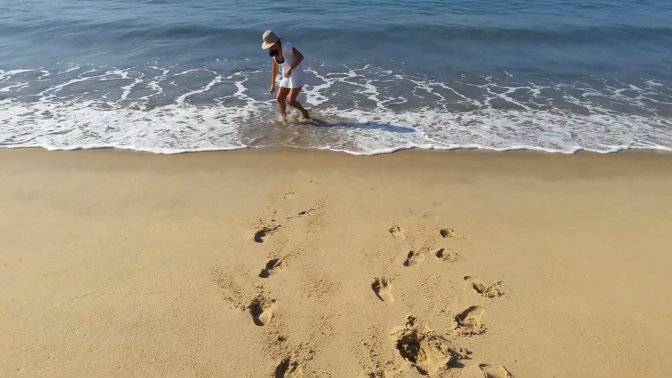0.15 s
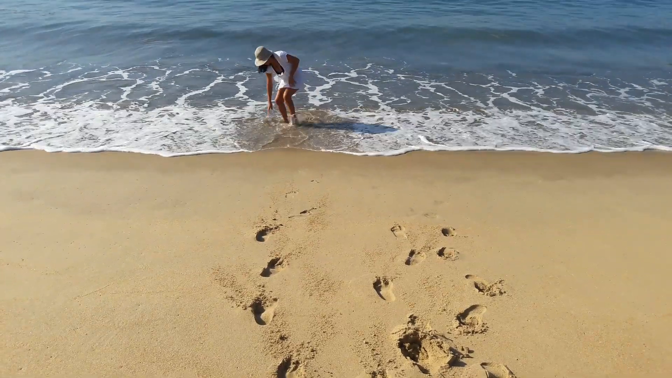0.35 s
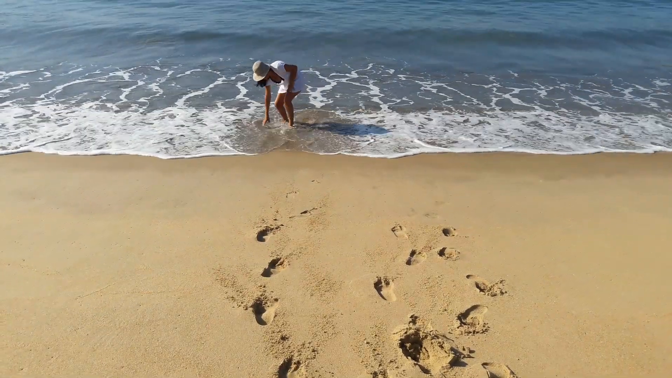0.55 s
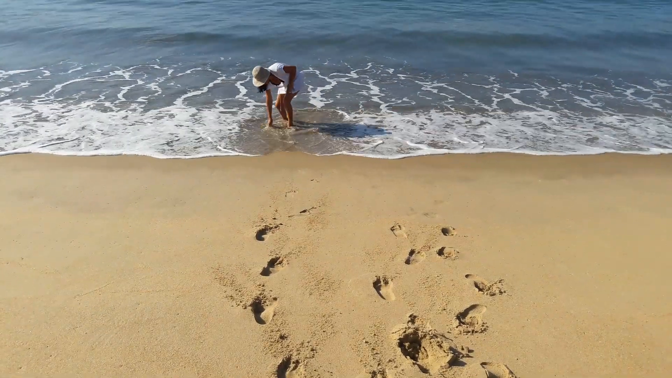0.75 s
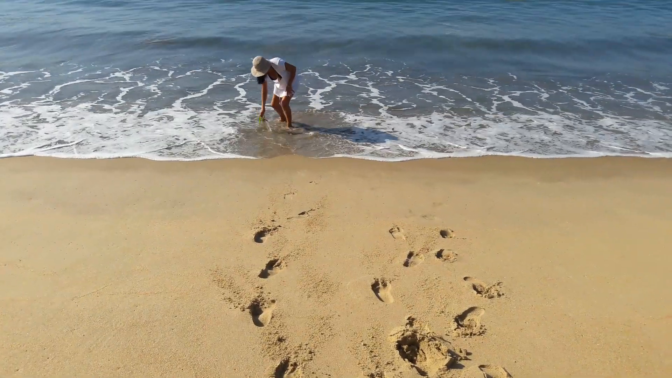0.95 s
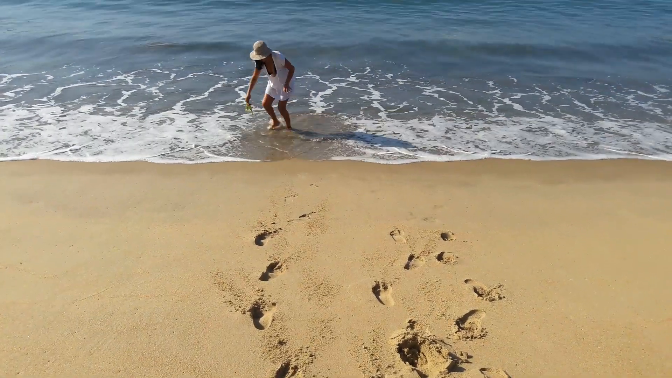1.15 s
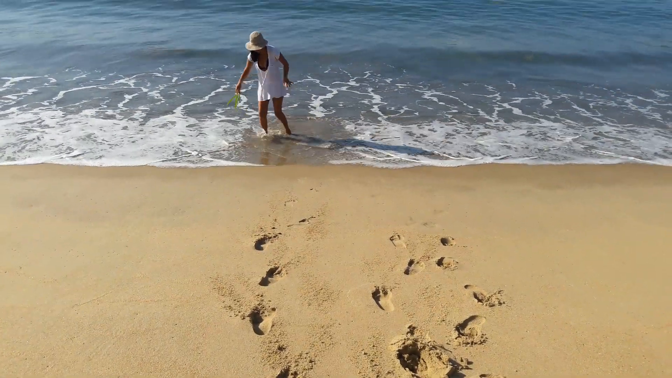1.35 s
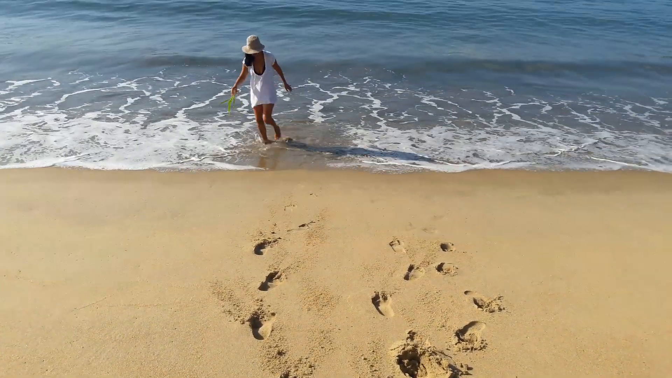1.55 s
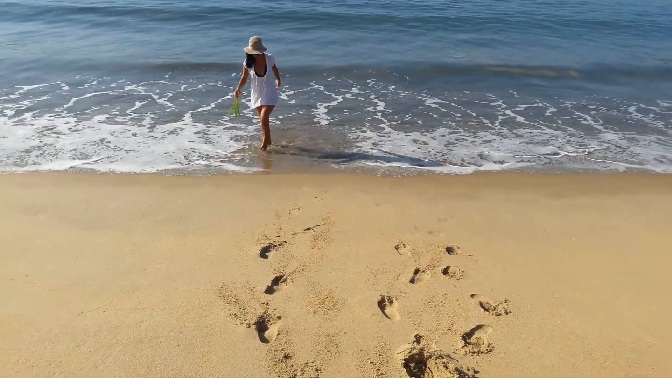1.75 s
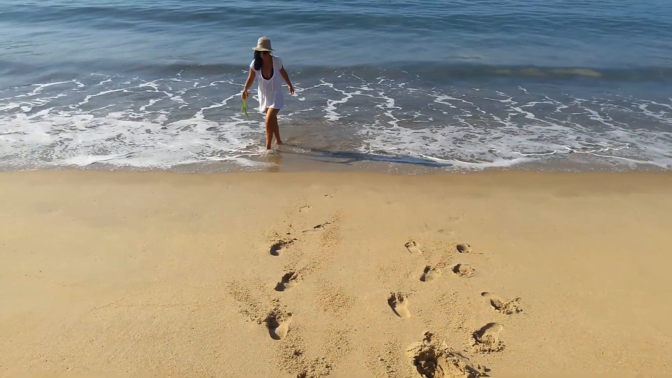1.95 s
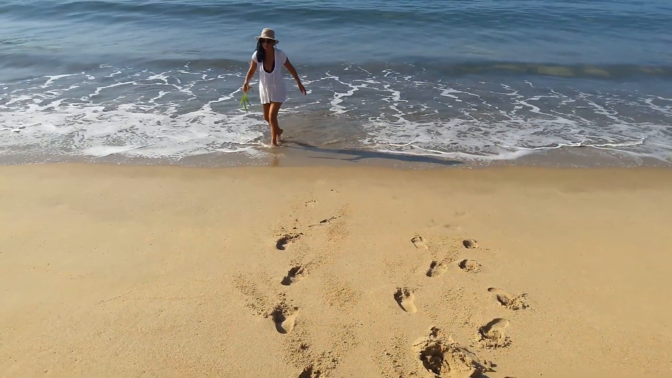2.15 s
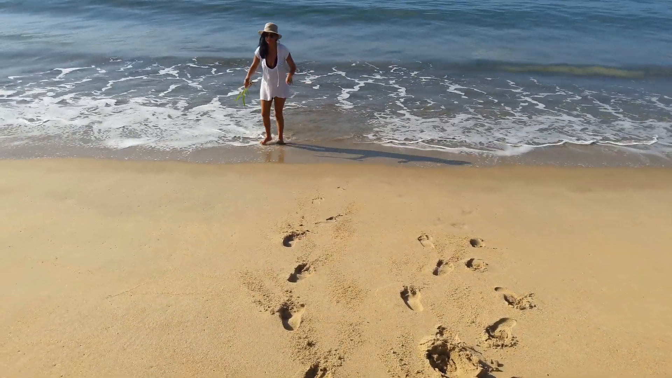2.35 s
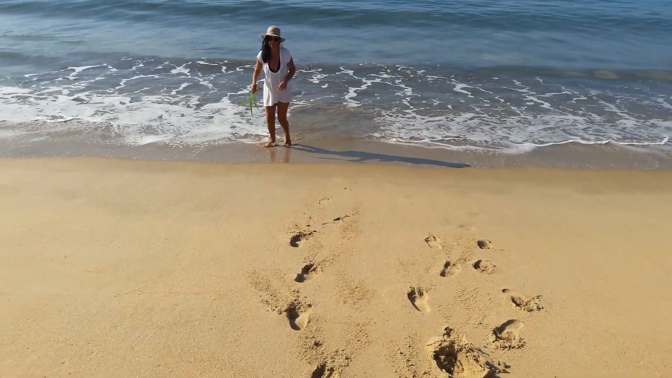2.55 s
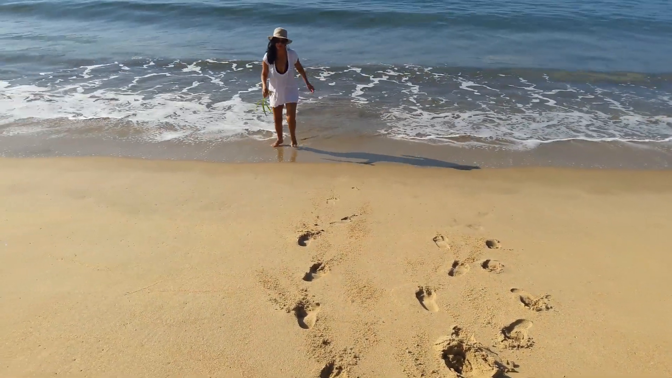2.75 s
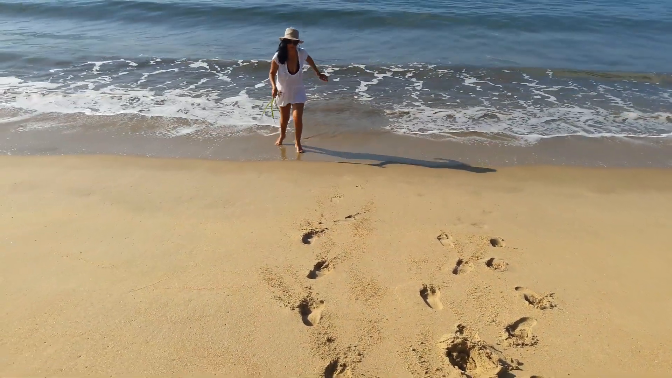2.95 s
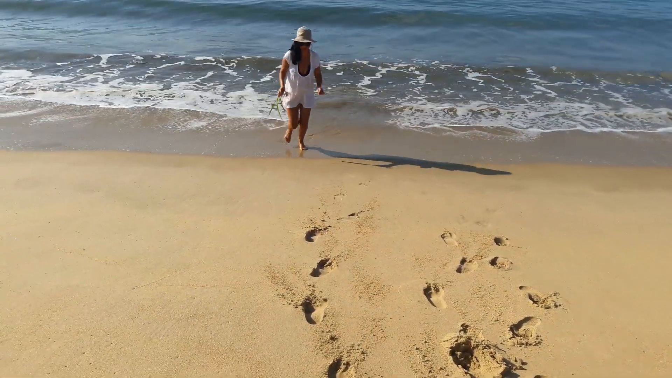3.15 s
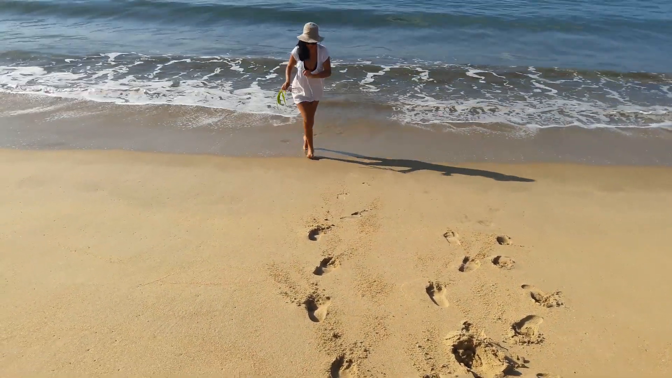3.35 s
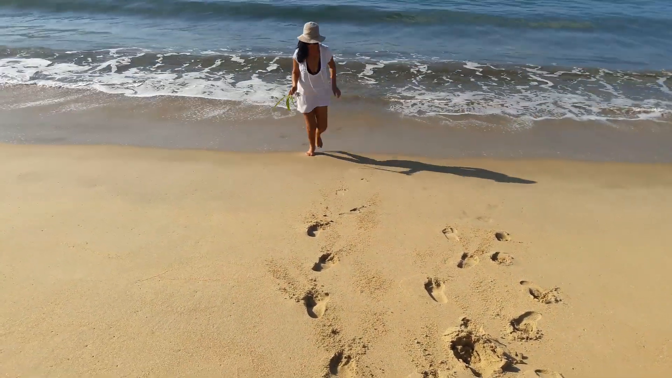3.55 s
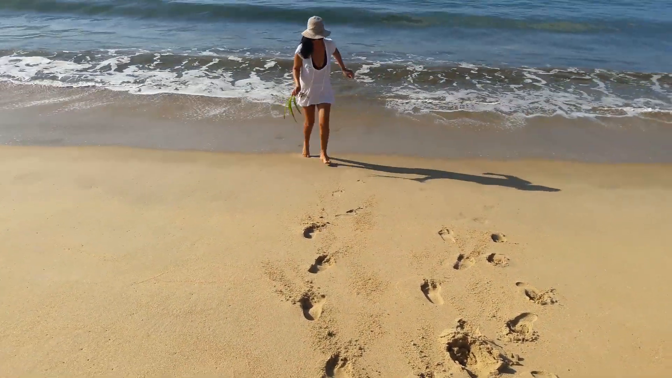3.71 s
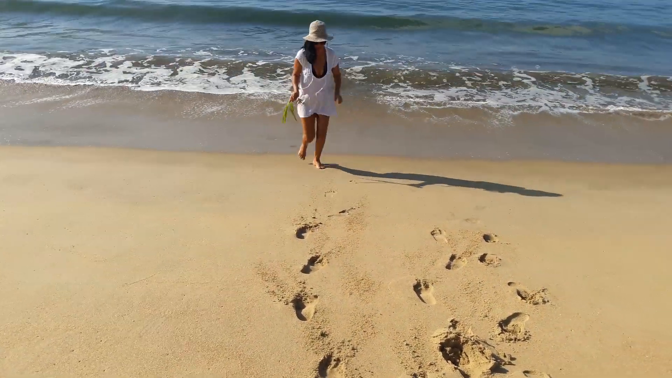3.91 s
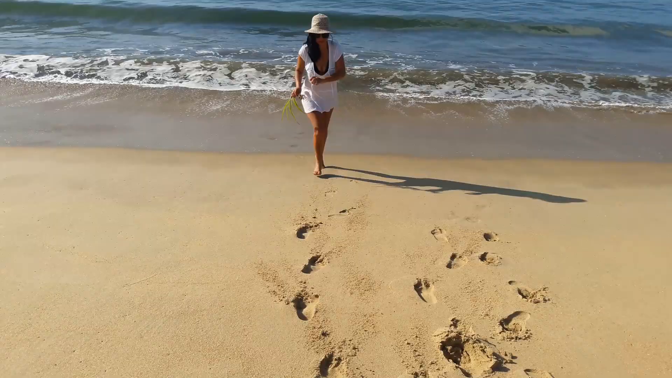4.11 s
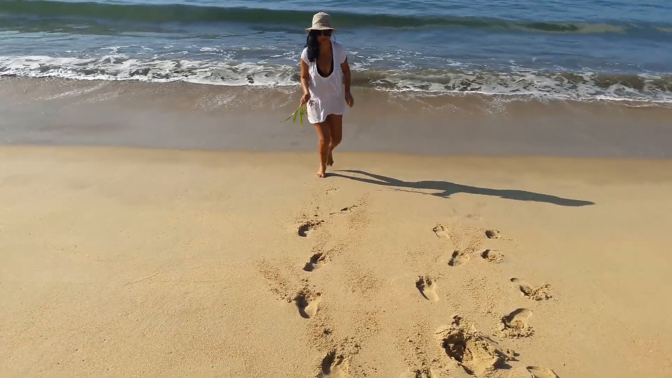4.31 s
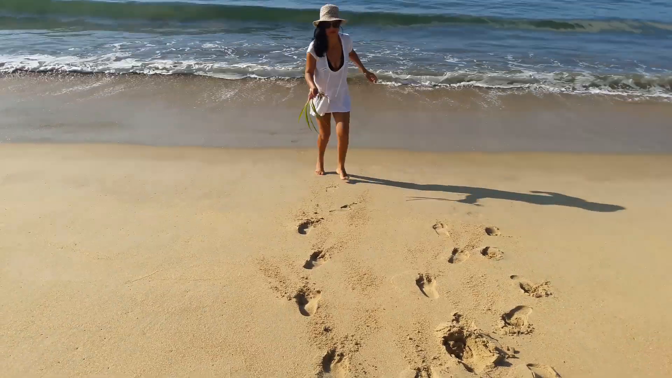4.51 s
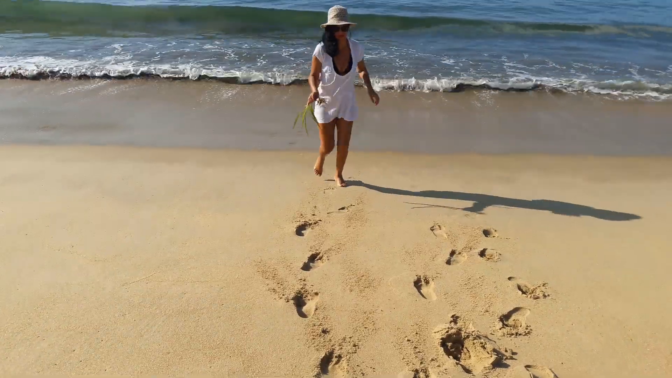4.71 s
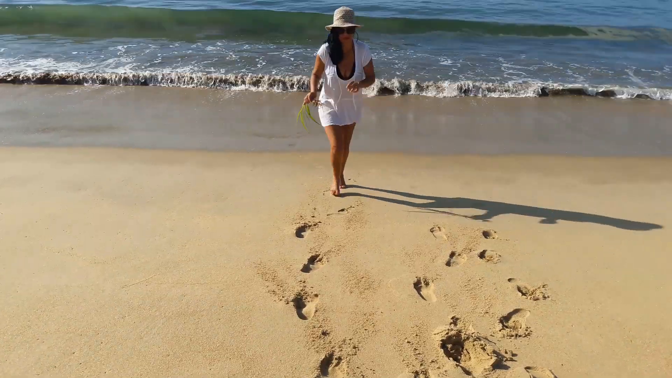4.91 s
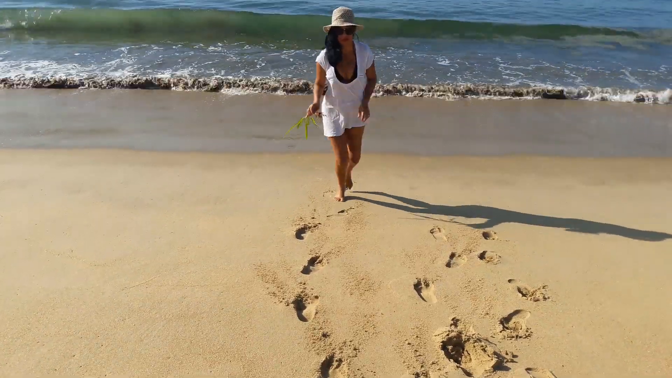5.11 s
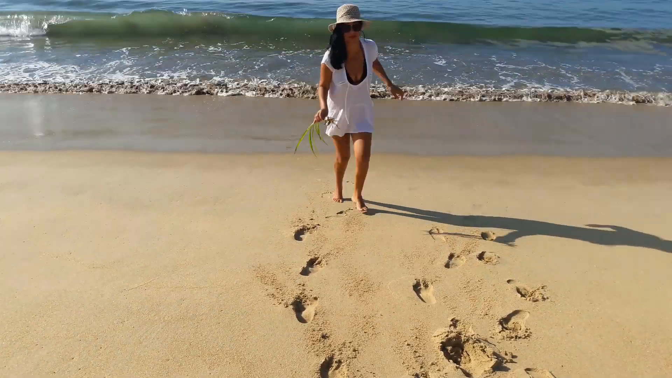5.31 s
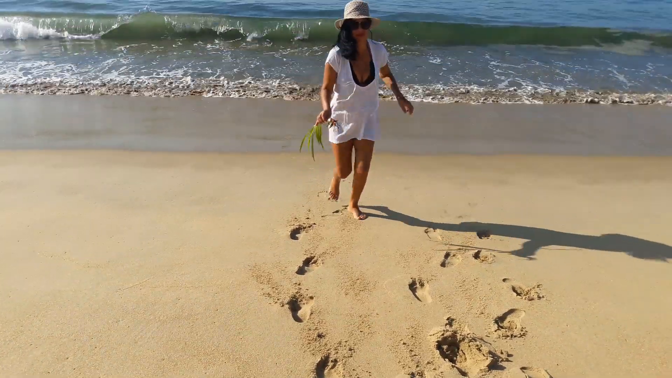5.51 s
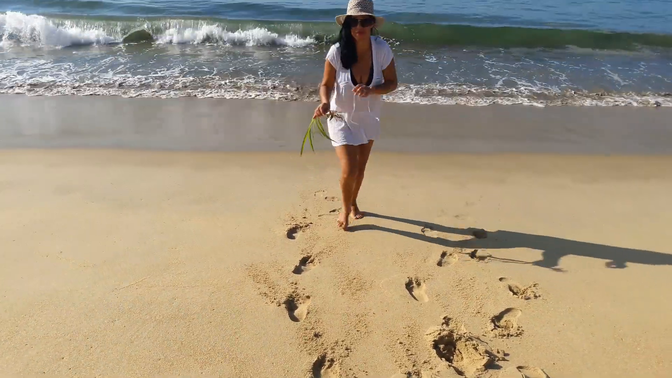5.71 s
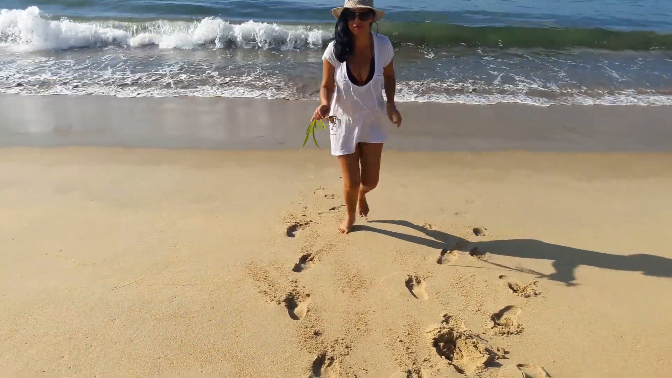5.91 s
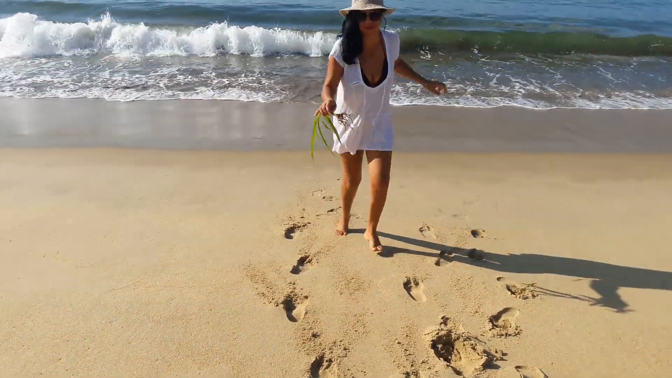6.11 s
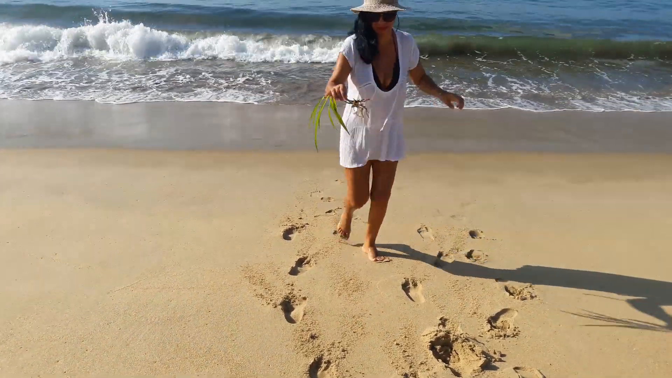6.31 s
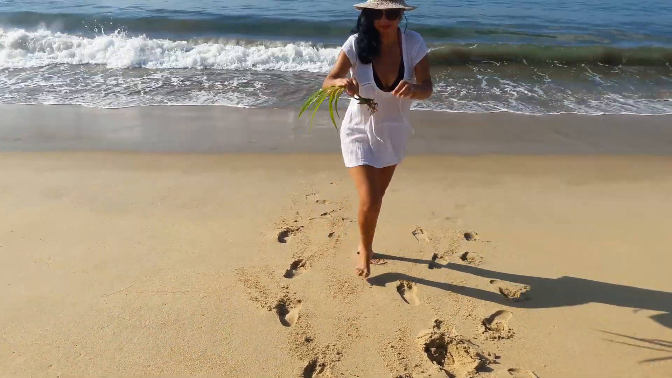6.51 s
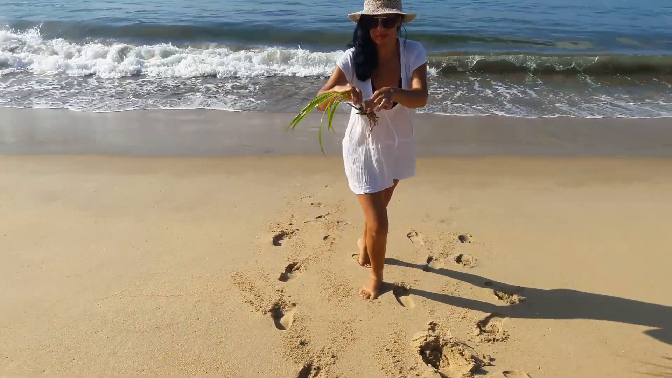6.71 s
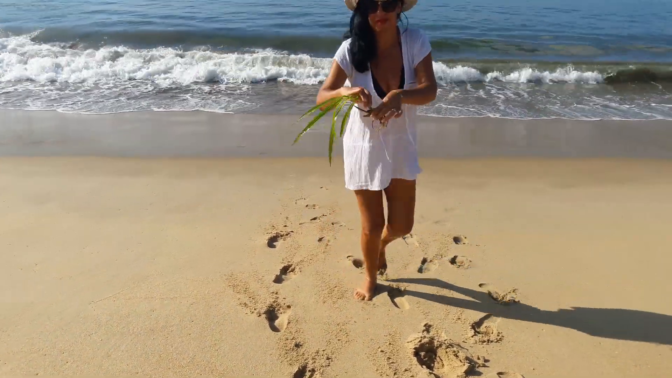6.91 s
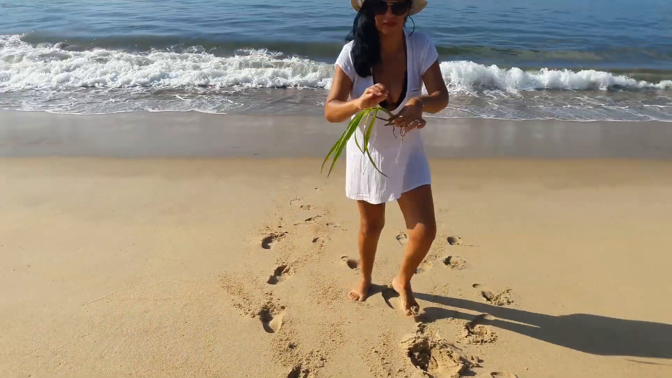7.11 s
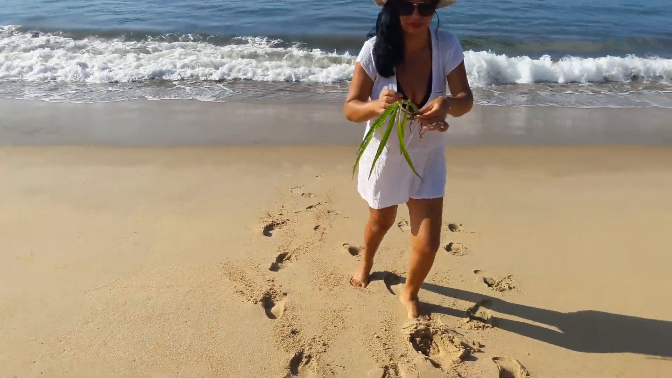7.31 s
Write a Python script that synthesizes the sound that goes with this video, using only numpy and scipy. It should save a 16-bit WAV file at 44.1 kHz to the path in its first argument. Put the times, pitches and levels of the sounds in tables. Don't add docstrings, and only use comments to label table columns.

```python
import sys
import numpy as np
from scipy import signal
from scipy.io import wavfile

SR = 44100
rng = np.random.default_rng(int(sys.argv[2]) if len(sys.argv) > 2 else 0)


def elevation(decibels):
    levels = np.asarray(decibels, float)
    return 10 ** (levels / 20)


def log_audio(samples):
    frames = np.atleast_2d(samples).T
    limited = np.clip(frames, -1, 1)
    pcm = np.round(limited * 32767).astype(np.int16)
    wavfile.write(sys.argv[1], SR, pcm)


N = 324569
STEP = 40


def surf(slosh_db, patch_db, flicker_db, bubble_db, splat_db):
    edges = 70 * 2 ** np.arange(0, 8.1, 1 / 3)
    hz = np.sqrt(edges[1:] * edges[:-1])
    steps = np.arange(N // STEP + 2) * STEP
    band_db = water_levels(hz, steps / SR)
    hiss = rng.standard_normal((2, N))
    pops = [bursts(per_s=900, spread_db=9), bursts(per_s=900, spread_db=7.5)]
    splats = bursts(per_s=300, spread_db=7)
    slosh = drift(25) + 0.53 * drift(40)
    patches = [drift(4.6) for k in range(len(hz) // 3 + 2)]
    out = np.zeros(N)
    for k, (low, high) in enumerate(zip(edges, edges[1:])):
        fizz = np.roll(hiss[k % 2] + elevation(bubble_db) * pops[k % 2], 977 * k)
        band = rms_one(band_pass(fizz + elevation(splat_db) * splats, low, high))
        bright = np.clip(np.log2(hz[k] / 120) / 16, 0, 1)
        part = k % 3 / 3
        patch = (1 - part) * patches[k // 3] + part * patches[k // 3 + 1]
        level_db = band_db[k] + slosh_db * bright * slosh + patch_db * patch + flicker_db * drift(15.6)
        level_db = level_db + gushes(hz[k], steps / SR)
        out += band * np.interp(np.arange(N), steps, elevation(level_db))
    return out


def water_levels(hz, t):
    # (frequency [Hz], density [dB per Hz])
    foam = [(53, -41), (90, -6), (218, 0), (1510, -5.5), (1880, -5), (3080, -15.5), (4070, -19),
            (5280, -28), (6690, -18.5), (15500, -31.5)]
    # (frequency [Hz], density [dB per Hz])
    breaker = [(53, -45), (90, -5.5), (264, 3), (526, -5), (1960, -9), (5050, -26), (6830, -23),
               (7770, -24), (13000, -34.5), (15500, -35)]
    # (time [s], force [dB], depth of its plunge [dB], distance [m])
    wave = [(3.0, -79, -5, 90), (3.5, -48, -3, 170), (3.8, -45, 0, 61), (4.18, -42.5, -1, 22),
            (4.3, -36, -2.5, 36), (4.7, -32.5, -4, 39), (4.86, -26, -6.5, 42), (5.1, -25, -9, 40),
            (5.25, -21.5, -10, 15), (5.45, -25, -1.5, 17), (5.7, -26, -1, 1.3), (5.9, -24.5, -1.5, 3.9),
            (6.3, -24.5, 0.5, 2), (6.55, -25, 0, 22), (6.9, -26, -1.5, 15), (7.1, -25, -3, 22),
            (7.36, -26, -0.5, 19)]

    def scaled(spectrum):
        db = at_hz(spectrum, hz) + 10 * np.log10(hz)
        middle = (hz > 500) & (hz < 2600)
        return (db - 10 * np.log10(elevation(2 * db)[middle].sum()))[:, None]

    drain_s, drain_db, drain_db_per_octave = 1.18, 3.5, 0.98
    drained = np.outer(drain_db + drain_db_per_octave * np.log2(hz / 250), 1 - np.exp(-t / drain_s))
    foam_db = scaled(foam) - 42.5 - drained

    s, *columns = np.transpose(wave)
    force_db, plunge_db, metres = [np.interp(t, s, c) for c in columns]
    air_db = np.outer(0.27 * (hz / 10000) ** 1.28, metres)
    plunge_hz = 557
    roar_db = np.outer(1 / (1 + (hz / plunge_hz) ** 3), plunge_db)
    wave_db = scaled(breaker) + force_db + roar_db - air_db

    mist_s, mist_rise_s, mist_db, mist_hz = 4.74, 0.16, -28, 8500
    mist_band = 1 / (1 + (mist_hz / hz) ** 4) / (1 + (hz / mist_hz / 1.6) ** 6)
    mist_power = np.clip((t - mist_s) / mist_rise_s, 0, 1) * elevation(2 * (force_db + mist_db))
    return 10 * np.log10(elevation(2 * foam_db) + elevation(2 * wave_db) + np.outer(mist_band, mist_power))


def gushes(hz, t):
    # (time [s], swell [dB], lowest pitch [Hz])
    sheets = [(0.655, 6, 1500), (.69, 5, 8000), (.72, 4, 6000), (1.285, 4.5, 3000), (1.55, 5, 3000),
              (1.634, 6.5, 1600), (2.505, 5, 1200), (2.55, 5.5, 3000), (3.08, 4, 7000), (4.877, 3, 4500),
              (5.071, 3.5, 2600), (5.14, 2.5, 4000), (5.169, 4.5, 2500), (5.29, 3, 1200), (5.62, 2, 2600),
              (5.74, 6, 5000), (5.768, 3.5, 1600), (5.88, 2, 7000), (6.13, 1, 7000), (6.21, 0, 6860),
              (6.5, 1, 7000), (6.957, 1, 3500), (7.15, 3, 3000), (7.185, 5, 4000), (7.23, 5, 6000),
              (6.775, 2.5, 5000), (5.67, 4, 3500), (4.79, 7, 8000)]
    # (time [s], swell [dB], length [s], pitch [Hz])
    spurts = [(0.168, 8, .03, 1000), (0.25, 11, 0.033, 1100), (0.308, 15, 0.015, 1200),
              (2.285, 20, .012, 950), (2.465, 7, .015, 1800), (2.53, 6, 0.055, 3300),
              (2.736, 8, 0.027, 1980), (3.8, 7.5, 0.67, 3400), (4.29, 11, 0.022, 1700),
              (4.688, 15, 0.0056, 1100), (4.952, 0.5, 0.16, 3850), (5.668, 5.5, 0.37, 2600),
              (5.72, 5, 0.12, 2400), (5.8, 0, .02, 1200), (5.84, 1, .02, 1200), (6.273, 5, .02, 2700),
              (3.95, 4.5, 0.27, 3600), (4, 3, .15, 5300), (4.4, 1, 0.27, 12000), (5.19, 3, 0.035, 5800),
              (4.9, 2, .15, 13000), (4.3, 2, 0.035, 8400), (.615, 13, .012, 4000), (7.05, 3.5, 0.23, 920),
              (5.88, 6, .1, 600), (6.9, 3, 0.078, 4050), (7.19, 6, .02, 1000), (5.323, 5.5, 0.078, 2300)]
    # (time [s], swell [dB])
    thuds = [(.645, 7), (1.53, 9), (2.07, 6), (2.58, 5), (3.8, 2), (4.29, 6), (4.48, 5), (4.59, 6.5),
             (4.795, -1), (4.89, 3), (5.23, 3), (5.311, 6.5), (5.6, 2), (5.66, 4), (5.74, 2.5),
             (5.815, -1.5), (5.895, 3), (6.165, 4), (6.36, 4), (6.514, 1), (6.93, 1), (7.3, 4)]
    span = 1.2
    rows = [(s, db, 0.022, low, 13000) for s, db, low in sheets]
    rows += [(s, db, length, mid / span, mid * span) for s, db, length, mid in spurts]
    rows += [(s, db, 0.019, 100, 480) for s, db in thuds]
    s, swell_db, length, lowest_hz, highest_hz = np.transpose(rows)[:, :, None]
    age = (t - s) / np.maximum(length, 0.004)
    shape = np.exp(-np.where(age < 0, 3 * age, age) ** 2)
    pitch_range = 1 / (1 + (lowest_hz / hz) ** 6) / (1 + (hz / highest_hz) ** 6)
    return (swell_db * shape * pitch_range).sum(axis=0)


def gurgle(per_s, cycles, below_db):
    clicks = bursts(per_s, spread_db=2.5)
    dealt = rng.integers(0, 24, N)
    out = np.zeros(N)
    for k, hz in enumerate(np.geomspace(750, 2400, 24)):
        r, w = elevation(-60 * hz / (cycles * SR)), 2 * np.pi * hz / SR
        struck = clicks * (dealt == k) + 1e-18
        out += signal.lfilter([0, np.sin(w)], [1, -2 * r * np.cos(w), r * r], struck)
    splash_db = water_levels(np.array([1300.0]), np.arange(N) / SR)[0]
    return rms_one(out) * elevation(splash_db - below_db)


def bearing(water):
    # (time [s], share from far along the shore [0-1], lag of the sand echo [ms],
    # share from straight ahead [0-1], share from the near swash [0-1])
    places = [(0, 0.47, 0.89, 0.4, 0.9), (.4, 0.28, 0.94, 1, 1), (1.8, 0.28, 0.89, 0.7, 1),
              (3.2, 0.38, 0.83, 0.8, .3), (3.45, 0.23, 0.78, 0, 0), (3.75, 0.34, 0.83, 0.02, 0),
              (4.1, 0.27, 0.9, 0.1, 0.1), (4.4, 0.66, 0.85, 0.2, 0), (4.72, 0.4, 0.88, 0.2, 0),
              (4.85, 0.4, 0.8, 0, 0.2), (5.05, 0.11, 0.76, 0.4, 0.13), (6.7, 0.02, 1, 0.3, 0),
              (6.95, 0.17, 0.63, 0.77, .2), (7.36, 0, 0.66, 0.25, 0)]
    # (frequency [Hz], width [Hz], gain [dB])
    sea_side = [(3760, 430, 1.5), (5100, 1900, -1.5)]
    # (frequency [Hz], width [Hz], gain [dB])
    shore_side = [(890, 500, -7), (1685, 580, 7), (3100, 160, 5), (5960, 300, -14), (6700, 1200, -8),
                  (14600, 5000, -8)]
    # (frequency [Hz], width [Hz], gain [dB])
    head_on = [(4040, 450, 9.5)]
    # (frequency [Hz], width [Hz], gain [dB])
    swash = [(6100, 280, -2.5), (6300, 400, 4.5), (7280, 860, 6.5), (9650, 400, 0), (10250, 800, 6),
             (12600, 1600, -5)]
    s, *columns = np.transpose(places)
    far, lag_ms, ahead, near = [np.interp(np.arange(N) / SR, s, c) for c in columns]
    far, ahead, near = np.clip([far, ahead, near], 0, 1)
    echo = np.interp(np.arange(N) - lag_ms * SR / 1000, np.arange(N), water)
    flank = peaks(0.9 * water + 0.33 * echo, shore_side)
    front = peaks(water, sea_side)
    front = front + ahead * (peaks(front, head_on) - front) + near * (peaks(front, swash) - front)
    return (1 - far) * front + far * flank


def air_pockets():
    # (time [s], peak [dB], pitch [Hz], ring [cycles])
    pockets = [(4.161, -37, 310, 6), (4.278, -19, 326, 5.1), (4.318, -21.5, 409, 6.5),
               (4.42, -25.5, 233, 7.4), (4.476, -15.5, 374, 11.5), (4.499, -24, 493, 9.6),
               (4.588, -26, 264, 4.4), (4.631, -18, 627, 6.6), (4.668, -23.5, 161, 7.1),
               (5.619, -14, 280, 8.3), (5.7, -14.5, 196, 8), (5.75, -10.5, 336, 9.5),
               (5.843, -11, 223, 3.9), (5.9, -14, 350, 9.2)]
    return bubbles(pockets, lag_s=0.00393, start=0.076, rise=0.064, trim_db=-3.5)


def drops_and_slaps():
    # (time [s], peak [dB], pitch [Hz], ring [cycles])
    drops = [(0.0513, -28, 1800, 12), (0.2962, -26, 1240, 12), (0.6514, -36, 1720, 8),
             (0.6684, -27, 1870, 9.7), (1.3029, -33, 1340, 8), (1.6147, -31, 1920, 12),
             (1.6364, -32, 1770, 9.2), (1.9175, -37, 1990, 8), (2.4608, -27, 1950, 11),
             (2.4684, -33, 1350, 8.8), (2.5144, -29, 1870, 8), (2.5696, -33, 1580, 8),
             (4.2398, -26, 1660, 7.1), (4.2857, -21, 2030, 9), (4.4797, -20.5, 1220, 5),
             (4.6823, -28, 1270, 11), (4.7401, -19, 1627, 9.4), (4.9452, -17, 1280, 8),
             (5.7503, -6.5, 1926, 8.1)]
    return bubbles(drops, lag_s=0.00059, start=0.063, rise=0.02, trim_db=-2)


def snaps_and_squeaks():
    # (time [s], peak [dB], pitch [Hz], ring [cycles])
    snaps = [
        (1.535, -45, 3970, 90),
        (2.64, -43, 1606, 120),
        (2.69, -44, 1500, 43),
        (2.72, -50, 1620, 60),
        (4.8116, -21.5, 5000, 8.2),
        (4.83, -30, 4600, 6),
        (5.612, -20, 2080, 30),
        (5.68, -18.5, 2250, 54),
        (5.72, -20, 2010, 39),
        (5.74, -14, 1910, 30),
    ]
    return bubbles(snaps, lag_s=0, start=0.1, rise=0.0038, trim_db=2)


def wading_plops():
    # (time [s], peak [dB], pitch [Hz], ring [cycles])
    plops = [
        (0.249, -32, 635, 8.7),
        (0.565, -31, 643, 9),
        (0.647, -32, 233, 6.5),
        (1.379, -32, 619, 11),
        (1.488, -30, 430, 4.8),
        (1.546, -28, 660, 3.9),
        (1.587, -30, 611, 5),
    ]
    return bubbles(plops, lag_s=0.00385, start=0.19, rise=0.045, trim_db=1.5)


def bubbles(events, lag_s, start, rise, trim_db):
    out = np.zeros(N + SR)
    for s, peak_db, hz, cycles in events:
        turns = np.arange(int(SR * 1.5 * cycles / hz)) * hz / SR
        attack = np.minimum(turns / (start * cycles), 1)
        jolt = 1 + 0.36 * np.exp(-turns / 1.7)
        shape = attack * jolt * elevation(-18 * turns / cycles) * (1 - turns / turns[-1])
        ring = np.sin(2 * np.pi * turns * (1 + rise * turns / cycles))
        at = round((s + lag_s) * SR)
        out[at:at + len(turns)] += elevation(peak_db + trim_db) * shape * ring
    return out[:N]


def wind():
    # (time [s], peak [dB])
    gusts = [(3.81, -51), (4.71, -47), (4.981, -40), (5.19, -32.5), (5.33, -35), (5.6, -39), (5.76, -27.5),
             (5.9, -29.5), (6.27, -29.5), (6.35, -42), (6.64, -37), (6.97, -35), (7.3, -46)]
    s, peak_db = np.transpose(gusts)[:, :, None]
    age = np.arange(N // STEP + 2) * STEP / SR - s
    gust_db = peak_db - np.where(age < 0, -143 * age, 88 * age)
    breeze_db = -61 + 1 * drift(4)
    level = np.sqrt(elevation(2 * gust_db).sum(axis=0) + elevation(2 * breeze_db))
    lumps = band_pass(rng.standard_normal(N + SR), 60, 140)[SR:]
    return rms_one(lumps) * np.interp(np.arange(N) / STEP, np.arange(len(level)), level) * elevation(2.5)


def bursts(per_s, spread_db):
    sizes = elevation(spread_db * np.minimum(rng.exponential(1, N), 5)) * rng.choice([-1, 1], N)
    return rms_one(sizes * (rng.random(N) < per_s / SR))


def drift(rate):
    r = np.exp(-2 * np.pi * rate * STEP / SR)
    noise = rng.standard_normal(N // STEP + 2002)
    return rms_one(signal.lfilter([1], [1, -2 * r, r * r], noise)[2000:])


def peaks(x, table):
    for hz, width, gain_db in table:
        w, a = 2 * np.pi * hz / SR, elevation(gain_db / 2)
        q = np.sin(w) * width / hz / 2
        x = signal.lfilter([1 + q * a, -2 * np.cos(w), 1 - q * a], [1 + q / a, -2 * np.cos(w), 1 - q / a], x)
    return x


def band_pass(x, low, high):
    return signal.sosfilt(signal.butter(2, [low, high], "band", fs=SR, output="sos"), x)


def at_hz(points, hz):
    table_hz, db = np.transpose(points)
    return np.interp(np.log(hz), np.log(table_hz), db)


def rms_one(x):
    return x / np.sqrt(np.mean(x ** 2) + 1e-20)


def scene():
    water = surf(slosh_db=0.5, patch_db=-0.47, flicker_db=0.74, bubble_db=-11, splat_db=-13.5)
    water = water + gurgle(per_s=220, cycles=33, below_db=14)
    pops = air_pockets() + drops_and_slaps() + snaps_and_squeaks() + wading_plops()
    return (bearing(water) + pops + wind())[None]


def band_limit(x):
    return signal.sosfilt(signal.butter(12, 15640, fs=SR, output="sos"), x)


def record(dry):
    # (frequency [Hz], width [Hz], gain [dB])
    port = [(1950, 920, 1.5), (3000, 2060, -4), (6730, 1000, 6), (7770, 500, -5), (8650, 820, 3),
            (11800, 1100, 0.5)]
    # (frequency [Hz], width [Hz], gain [dB])
    port_top = [(12800, 1500, 5)]
    coloured = peaks(peaks(dry, port), port_top)
    x = signal.sosfilt(signal.butter(2, 84, "high", fs=SR, output="sos"), coloured)
    rumble = band_pass(rng.standard_normal(dry.shape), 40, 80)
    hiss = rng.standard_normal(dry.shape)
    x = x + elevation(-68) * rms_one(rumble) + elevation(-81) * hiss - 0.00075
    ceiling = 0.7
    return band_limit(ceiling * np.tanh(x / ceiling))


dry = scene()
out = record(dry)
log_audio(out)
```